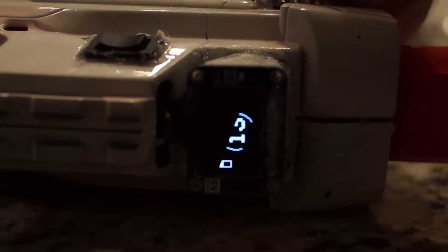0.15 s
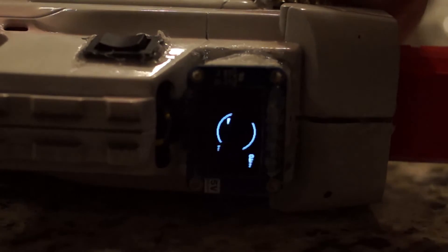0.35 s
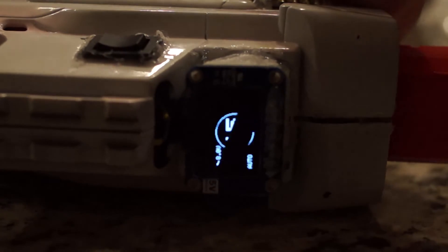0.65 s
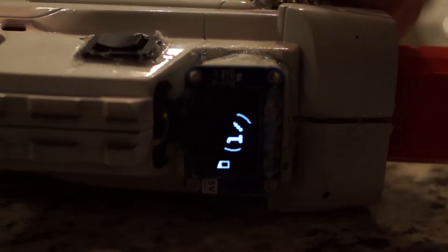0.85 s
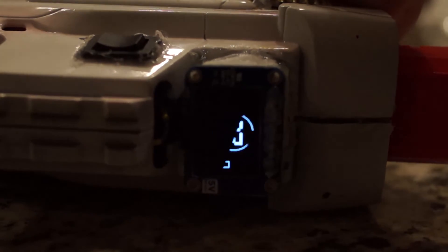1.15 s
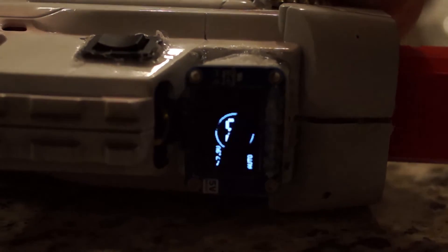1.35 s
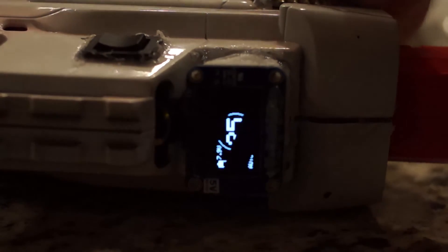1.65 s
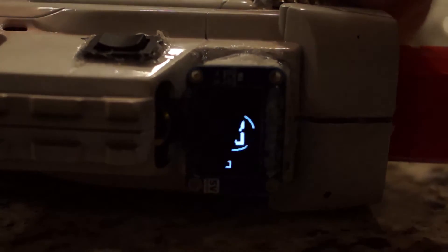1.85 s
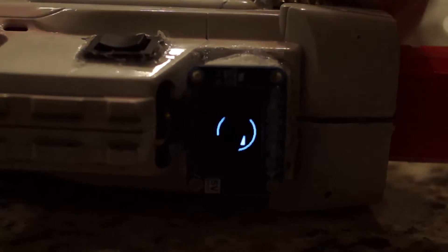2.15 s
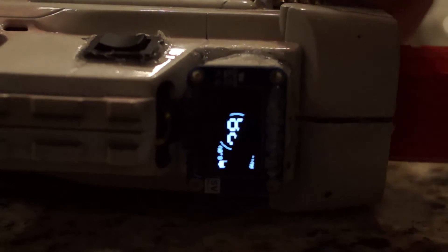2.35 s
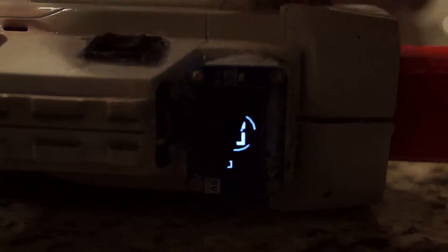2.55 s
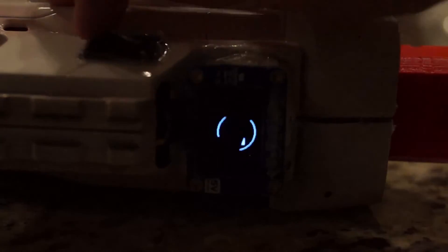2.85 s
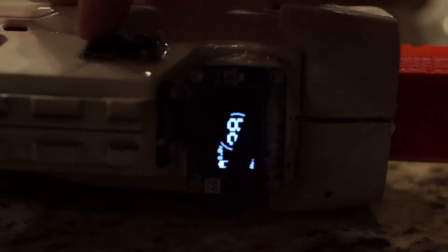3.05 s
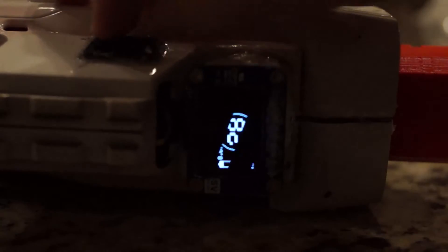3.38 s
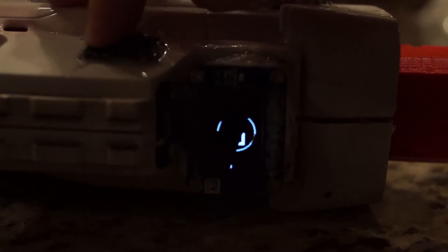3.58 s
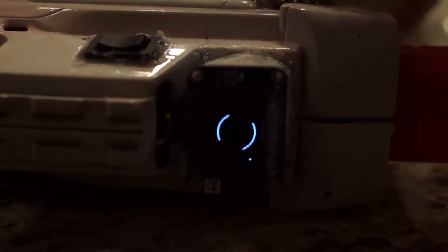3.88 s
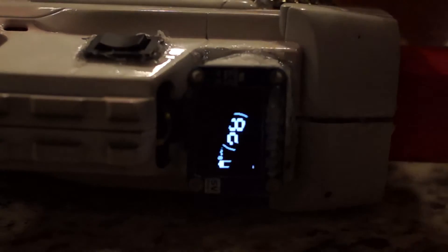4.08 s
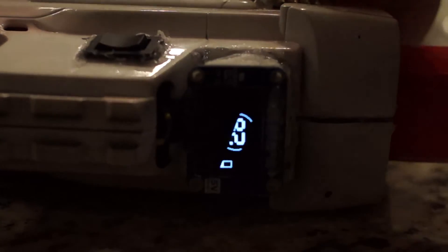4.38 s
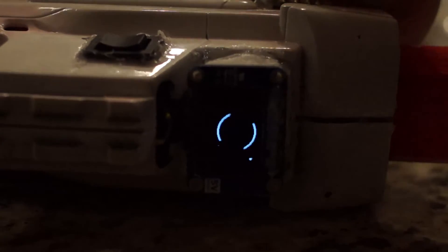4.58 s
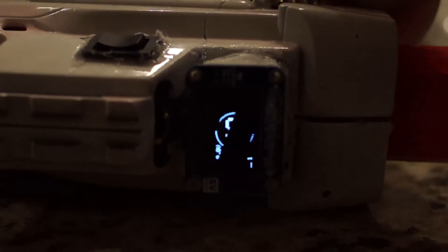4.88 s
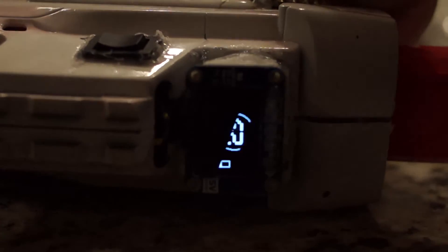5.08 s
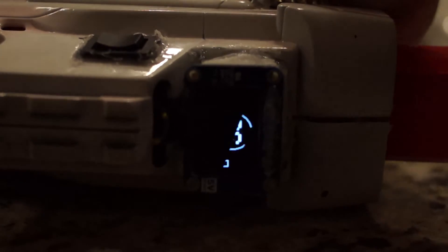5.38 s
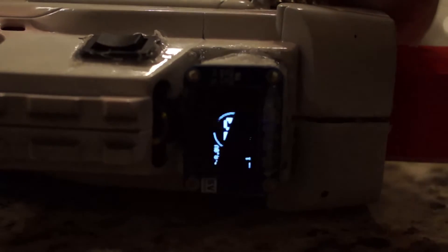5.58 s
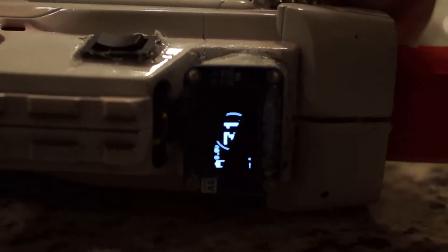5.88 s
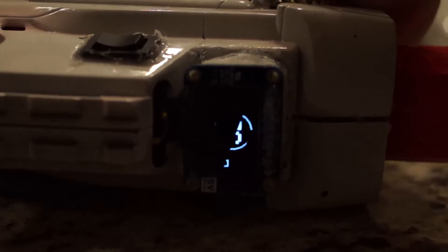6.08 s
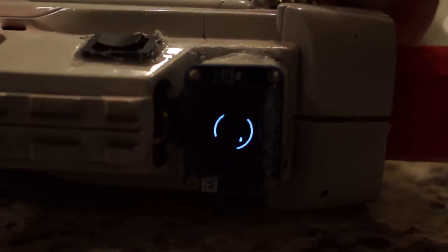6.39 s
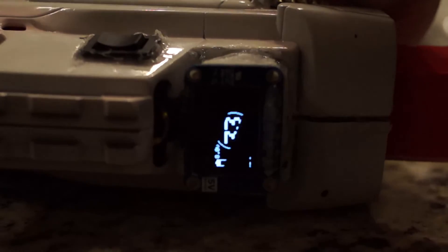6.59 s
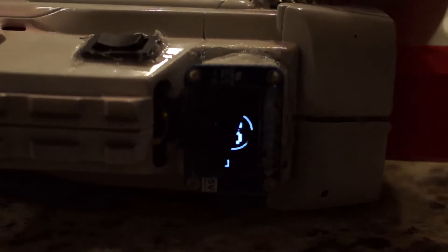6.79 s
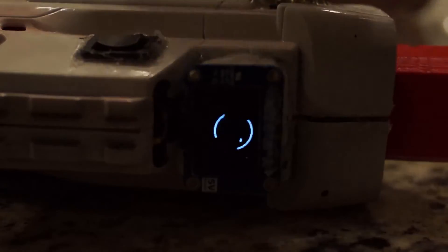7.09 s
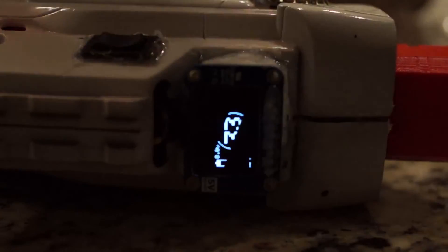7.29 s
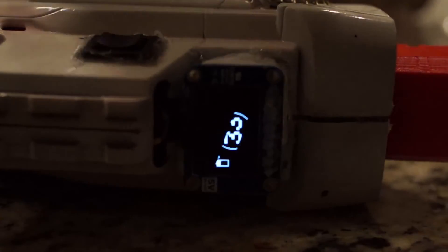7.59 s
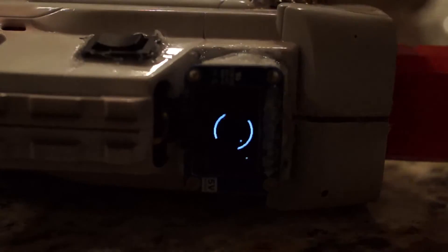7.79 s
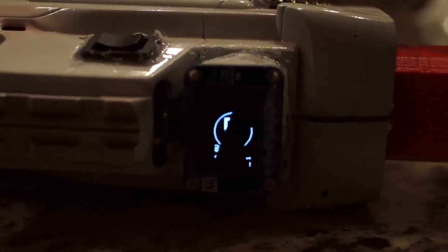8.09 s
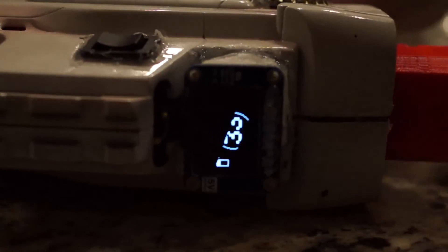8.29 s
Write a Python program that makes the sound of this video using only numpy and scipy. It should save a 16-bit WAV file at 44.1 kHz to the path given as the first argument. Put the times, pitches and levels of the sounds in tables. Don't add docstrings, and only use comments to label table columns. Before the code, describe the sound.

A close stereo pickup on a stone kitchen counter, with quiet air, hiss and low appliance hum; a faint echo of an earlier burst fades at the start. At 0.3 s a finger clicks a plastic trigger, and from 0.46 to 1.7 s a small geared motor spins up quickly to a steady nasal whine, with bright grinding hiss and rattling knocks about ten turns a second, then brakes with a falling pitch. More clicks near 2.0 s bring a short burst until 2.4 s. Light handling and crisp switch snaps follow at 3.2-3.7 s, with a stronger hollow clack at 4.2 s. From 4.7 to 6.4 s, five trigger pulls, roughly 0.4 s apart, each click and fire a tenth-of-a-second whirring clack with short room echoes. After a quiet second, plastic snaps and dull rocking thumps occur at 7.4-7.8 s, then sharper clicks from 8.1 to 8.4 s.

```python
import sys
import numpy as np
from scipy import signal
from scipy.fft import rfft, irfft, next_fast_len
from scipy.io import wavfile
from scipy.ndimage import uniform_filter1d, map_coordinates

SR = 44100
rng = np.random.default_rng(int(sys.argv[2]) if len(sys.argv) > 2 else 0)


def invert_db(x):
    u = np.asarray(x, float) / 20
    return 10 ** u


def unload_wav(signal):
    wavfile.write(
        sys.argv[1],
        SR,
        np.round(np.clip(np.atleast_2d(signal).T, -1, 1) * 32767).astype(np.int16),
    )


N = 372204
T = np.arange(N) / SR

# (power on [s], first knock [s], power off [s])
BURST_TIMES = [
    (.456, .4755, 1.676),
    (2.081, 2.1012, 2.388),
    (4.781, 4.8025, 4.888),
    (5.185, 5.2031, 5.289),
    (5.552, 5.5725, 5.658),
    (5.921, 5.941, 6.027),
    (6.294, 6.3165, 6.402),
]
BURST_DB = [-20, -20, -20, -19.5, -20, -19.5, -20]
BURSTS = [(*times, db) for times, db in zip(BURST_TIMES, BURST_DB)]
SHAFT_HZ = 590.8
TURN_S = .10163
# (shaft order, level [dB rms])
WHINE = [(1, -29.5), (2, -51.5), (3, -29.5), (4, -43), (6, -26), (7, -47), (14, -47)]
# (frequency [Hz], gain [dB])
RADIATION = [(300, -20), (540, -12.5), (585, 1.5), (1000, -2.5), (1250, 1), (1600, 6), (1770, 3),
             (2800, -4), (3400, 0.5), (3545, 2)]
# (time [s], thud [dB], tick [dB], decay t60 [s])
KNOCKS = [(0, 6, 2.5, 0.043), (.008, 3, 1, 0.057), (0.0293, 9, 6, 0.086), (.04, -4.5, -2, 0.028),
          (0.054, 5, 7, .07), (.068, 4, -10.5, 0.028), (0.073, -1, 8, 0.037)]
# (time [s], grind [dB], hiss [dB])
LOAD = [(0, -5, 4), (0.021, 0, 1), (.035, -6, -2.5), (.05, -1, -2.5), (.065, -4.5, 2), (.08, -2, -10.5),
        (.1, -7.5, 3)]
# (frequency [Hz], level [dB per Hz])
SHELL = [(200, -64.5), (330, -20), (430, -24), (520, -24.5), (630, -10), (690, -2.5), (850, -5),
         (1000, -2.5), (1350, -3), (1750, -2.5), (2070, -11), (3100, -15), (4400, -18.5), (7500, -107)]
# (frequency [Hz], width [Hz], lift [dB])
PANELS = [(482, 33, 10.5), (548, 24, 14.5), (670, 15, 1.5), (985, 50, 3), (1194, 55, 4), (1440, 31, -1),
          (1520, 18, 6), (2425, 120, 4.5), (2705, 100, 5)]
# (frequency [Hz], level [dB per Hz])
TEETH = [(1300, -26), (2200, -11.5), (2780, -4), (3160, -7.5), (4190, -6.5), (5700, -11), (7700, -14.5),
         (8300, -17), (9000, -19.5), (11500, -19)]
# (frequency [Hz], width [Hz], lift [dB])
CASING = [(3410, 210, 3.5), (4160, 150, 2.5), (6090, 220, 2), (8300, 250, 2.5)]

# (time [s], peak [dB])
LANDINGS = [(.312, -32.5), (.446, -34), (1.952, -33), (2.027, -40), (2.068, -35), (4.678, -35.5),
            (5.092, -36), (5.166, -30), (5.442, -27.5), (5.837, -29), (5.912, -30), (6.196, -23)]
# (snap [dB], tick [dB], left-right [dB])
LANDING_COLOUR = (-9, -18, 1)
# (spring ticks [s], latch drops [s], lever seats [s], strength [dB])
PULLS = [(.347, 0.367, .405, -38.5), (1.977, 1.99, 2.043, -33), (4.701, 4.713, 4.741, -30),
         (5.117, 5.126, 5.148, -30.5), (5.464, 5.475, 5.509, -31.5), (5.858, 5.867, 5.897, -31.5),
         (6.221, 6.236, 6.266, -31.5)]
CREAK_LEAD_S = .011
# (level over the strength [dB], snap [dB], tick [dB], left-right [dB])
STAGES = [
    (-5.5, -8, -16, -2),
    (-2.5, -2, -5, 2.5),
    (2, -13.5, -28, -.8),
    (-2, -9, -20, .6),
]
# (time [s], peak [dB], snap [dB], tick [dB], ring [Hz])
HANDLING = [(3.176, -56, 1, -16, 1560), (3.198, -48, -1, -19, 1850), (3.344, -47, -10, -21.5, 1770),
            (3.402, -42.5, -4, -24, 990), (4.076, -53, -11, -1.5, 1000), (4.144, -57, 1.5, 4, 1020),
            (4.202, -27.5, -5, -22, 1070), (4.211, -32, -22.5, -16, 830), (7.424, -32, 3, -28, 780),
            (7.598, -38, -2, -22.5, 1370), (7.635, -45, 10.5, -23, 2150), (7.656, -38, 5, -13, 2060),
            (7.795, -46.5, -0.5, -14.5, 1410), (8.101, -51.5, -1.5, -5, 1440),
            (8.128, -44, 10.5, -11, 1637), (8.362, -52, 7, -5, 1500), (8.396, -37, -4, -14, 1590)]
# (time [s], peak [dB], snap [dB], tick [dB], ring [Hz])
SNAPS = [(3.586, -36.5, 11.5, -1, 1820), (3.7161, -40, 9, 1.5, 1600), (4.175, -23, -11, -18.5, 1195),
         (7.57, -35, 5, -19, 2720), (8.212, -34.5, 7, -9, 1240), (8.3215, -34, 5, -9.5, 1060),
         (8.399, -27.5, 5, -17, 1850), (4.206, -27.5, -3, -10, 1010)]
# (pitch ratio, level [dB])
OVERTONES = [(1.55, -5), (2.7, -8)]
# (time [s], peak [dB], frequency [Hz])
THUMPS = [(4.204, -36.5, 802), (7.426, -35, 754), (7.449, -45, 555), (7.567, -40, 322), (7.598, -45, 520),
          (7.634, -44.5, 580), (7.655, -42, 555)]
HAND_PAN_DB, SWITCH_PAN_DB = 1, 3.5

# (frequency [Hz], decay t60 [s])
KITCHEN = [(300, 0.55), (800, 0.27), (2000, 0.35), (5500, 0.45), (11000, 0.33)]
# (frequency [Hz], level [dB per Hz])
FADING = [(300, -28), (900, -2), (1500, 2.5), (1900, 2), (2400, -12), (3800, -4.5), (6000, -17),
          (11000, -31)]
# (frequency [Hz], level [dB per Hz])
AIR = [(13, -52), (22, -27), (59, -5.5), (90, -12), (160, -3.5), (192, -9.5), (243, -3.5), (399, -8),
       (492, -8.5), (897, -16), (970, -15.5), (1440, -19), (1640, -22.5), (5580, -32), (11300, -40),
       (14700, -64), (22000, -120)]
# (frequency [Hz], width [Hz], lift [dB])
AIR_BANDS = [(1740, 300, 4), (5400, 390, 4)]
# (frequency [Hz], likeness)
ALIKE = [(30, 1), (150, 1), (400, 0.95), (1000, 0.725), (3000, 0.41), (10000, 0.86)]
# (frequency [Hz], level [dB rms])
HUM = [(120, -62.5), (151, -70), (170, -60.5)]
AIR_DB = -50.5
# (frequency [Hz], gain [dB])
EDGE = [(24, -15.5), (40, -1), (10980, -0.5), (11120, -36), (12100, -79), (12300, -110)]


def unit(x):
    return x / np.sqrt(np.mean(x ** 2) + 1e-20)


def along(points, hz):
    f, v = np.transpose(points)
    return np.interp(np.log(hz + 1), np.log(f + 1), v)


def lifts(peaks, hz):
    return sum(db / (1 + (2 * (hz - peak_hz) / width) ** 2) for peak_hz, width, db in peaks)


def coloured(x, db_at):
    m = 2 * next_fast_len(N // 2 + 8192)
    gain = invert_db(np.maximum(db_at(np.fft.rfftfreq(m, 1 / SR)), -100))
    cepstrum = irfft(np.log(unit(gain)), m)
    cepstrum[1:m // 2] *= 2
    cepstrum[m // 2 + 1:] = 0
    return irfft(rfft(x, m) * np.exp(rfft(cepstrum)), m)[..., :N]


def band(x, low_hz, high_hz):
    return signal.sosfilt(signal.butter(2, [low_hz, high_hz], "band", fs=SR, output="sos"), x)


def wobble(rate):
    return map_coordinates(rng.standard_normal(int(N * rate / SR) + 4), [T * rate])


def dying(times, gains, t60):
    jumps = np.bincount(np.round(np.asarray(times) * SR).astype(int), gains, N)[:N]
    return signal.lfilter([1], [1, -invert_db(-60 / (t60 * SR))], jumps)


def rings(rows, t60):
    out = np.zeros(N + SR)
    t = np.arange(SR // 5) / SR
    for s, db, hz in rows:
        out[round(s * SR):][:len(t)] += invert_db(db - 60 * t / t60) * np.sin(2 * np.pi * hz * t)
    return out[:N]


def motor_motion():
    speed, force, crank, power = np.zeros((4, N))
    for on, first, off, db in BURSTS:
        powered = np.minimum(T, off)
        since_off = np.clip(T - off, 0, None)
        spin_up = 1 - np.exp(-np.clip(powered - on, 0, None) / .024)
        burst_speed = spin_up * np.exp(-since_off / .035)
        now = burst_speed > speed
        speed[now] = burst_speed[now]
        force[now] = invert_db(db)
        crank[now] = ((powered - first) % TURN_S)[now]
        power[now] = np.exp(-since_off / 0.16)[now]
    return speed, force, crank, power


def motor_whine(speed, force, power):
    unsteady = 1 + 0.00073 * wobble(20) + 0.051 * (1 - speed) * wobble(120)
    angle = 2 * np.pi * np.cumsum(SHAFT_HZ * speed * unsteady) / SR
    strain = 1 + 9 * (1 - speed) * speed * power ** 0.51 * invert_db(2.6 * wobble(70))
    whine = np.zeros(N)
    for order, db in WHINE:
        radiated_db = db + along(RADIATION, order * SHAFT_HZ * speed)
        level = invert_db(radiated_db + .6 * wobble(30)) * np.sqrt(2)
        drive = strain if order < 5 else speed ** 3
        whine += level * drive * np.sin(order * angle)
    return whine * speed * power * force / invert_db(-16.5)


def gear_noise(speed, force, crank):
    at, grind_db, hiss_db = np.transpose(LOAD)
    teeth = invert_db(2.4 * wobble(260))
    grind = invert_db(np.interp(crank, at, grind_db) + 1.6 * wobble(30)) * teeth * force * speed ** 0.59
    hiss = invert_db(np.interp(crank, at, hiss_db) + 1.4 * wobble(30)) * teeth * force * speed ** 1.4
    starts, levels = np.transpose(BURSTS)[[0, 3]]
    grind += uniform_filter1d(dying(starts + 0.0051, invert_db(levels - 1.5), 0.23), size=420)
    hiss += uniform_filter1d(dying(starts + .002, invert_db(levels - 15), .06), size=120)
    scatter_db = 1.5
    for offset, thud_db, tick_db, t60 in KNOCKS:
        hits = np.array([(s, db) for on, first, off, db in BURSTS
                         for s in np.arange(first, off - .06, TURN_S) + offset])
        luck = rng.standard_normal((len(hits), 3))
        times = hits[:, 0] + .0008 * luck[:, 0]
        pace = np.interp(times, T, speed) ** 0.55
        thud = pace * invert_db(hits[:, 1] + thud_db + scatter_db * luck[:, 1])
        tick = pace * invert_db(hits[:, 1] + tick_db + scatter_db * luck[:, 2])
        grind += uniform_filter1d(dying(times + 0.00073, thud, t60), size=90)
        hiss += dying(times, tick, 0.6 * t60)
    worn = 0.6 * rng.standard_normal(SR)[(crank * SR).astype(int)]
    rough = grind * (worn + 0.87 * rng.standard_normal(N))
    shell = coloured(rough, lambda hz: along(SHELL, hz) + lifts(PANELS, hz))
    mid, side = coloured(hiss * rng.standard_normal((2, N)), lambda hz: along(TEETH, hz) + lifts(CASING, hz))
    bright = np.array([mid + 0.23 * side, mid - 0.4 * side])
    return invert_db(-3.5) * shell * invert_db([[.4], [-.4]]) + invert_db(-6) * bright * invert_db([[-.5], [.5]])


def motor():
    speed, force, crank, power = motor_motion()
    whine = motor_whine(speed, force, power)
    return whine * invert_db([[.6], [-.6]]), gear_noise(speed, force, crank)


def clicks(rows, knock_t60, snap_t60, tick_t60, size, strike):
    s, db, snap_db, tick_db, pan_db = np.transpose(rows)[:5]
    parts = [(db + 10.5, knock_t60, 650, 1500),
             (db + snap_db + 4.5, snap_t60, 1600, 3900),
             (db + tick_db + 3.5, tick_t60, 4500, 10500)]
    out = np.zeros((2, N))
    for level, t60, low_hz, high_hz in parts:
        noise = rng.standard_normal(N)
        noise[np.round(s * SR).astype(int)] = strike
        sides = [noise * uniform_filter1d(dying(s, invert_db(level + side * pan_db / 2), t60), size)
                 for side in (1, -1)]
        out += band(sides, low_hz, high_hz)
    return out


def trigger():
    rows = [(s, db, *LANDING_COLOUR) for s, db in LANDINGS]
    for tick, latch, seat, db in PULLS:
        times = (tick - CREAK_LEAD_S, tick, latch, seat)
        rows += [(s, db + lift_db, *colour) for s, (lift_db, *colour) in zip(times, STAGES)]
    return clicks(rows, 0.043, 0.049, 0.026, size=60, strike=0.92)


def handling():
    grip = [(*row[:4], HAND_PAN_DB) for row in HANDLING]
    switch = [(*row[:4], SWITCH_PAN_DB) for row in SNAPS]
    return (clicks(grip, 0.041, 0.039, 0.028, size=10, strike=1.6)
            + clicks(switch, 0.015, 0.014, 0.016, size=1, strike=1.5))


def levers():
    tones = [(s, db + max(snap_db, 0) - 4, hz) for s, db, snap_db, tick_db, hz in HANDLING + SNAPS]
    overtones = [(s, db + max(snap_db, 0) - 6 + less_db, hz * ratio)
                 for s, db, snap_db, tick_db, hz in SNAPS for ratio, less_db in OVERTONES]
    return rings(tones, .014) + rings(overtones, 0.011)


def rocking():
    s, db, hz = np.transpose(THUMPS)
    thump = dying(s, invert_db(db + 13.5), 0.13) * rng.standard_normal(N)
    return rings(THUMPS, 0.19) + band(thump, 180, 777)


def counter(x, t60):
    t = np.arange(SR // 8) / SR
    shared, own = rng.standard_normal((2, len(t))) * invert_db(-60 * t / t60) * (t > .0015)
    tails = np.array([shared + 0.86 * own, shared - 0.8 * own]) / np.linalg.norm(shared)
    return signal.fftconvolve(x, tails, axes=1)[:, :N]


def kitchen(x, spread_db):
    delayed = np.pad(x.mean(0), (220, 0))[:N]
    hz, t, z = signal.stft(delayed, SR, nperseg=512)
    keep = invert_db(-120 * t[1] / along(KITCHEN, hz))
    power = [signal.lfilter([0, 1 - k], [1, -k], np.abs(row) ** 2) for k, row in zip(keep, z)]
    noise = signal.stft(rng.standard_normal((2, N)), nperseg=512)[2]
    mid, side = signal.istft(noise / np.std(noise) * np.sqrt(power), nperseg=512)[1][:, :N]
    return np.array([mid + invert_db(spread_db) * side, mid - invert_db(spread_db) * side])


def earlier_burst():
    fading = dying([0], [invert_db(-44.5)], 0.46) * rng.standard_normal((2, N))
    echo = coloured(fading, lambda hz: along(FADING, hz))
    return echo.mean(0) + 0.43 * echo


def background():
    hz = np.fft.rfftfreq(N, 1 / SR)
    turn = np.arccos(np.clip(along(ALIKE, hz), -1, 1)) / 2
    z = rfft(rng.standard_normal((2, N))) * invert_db(along(AIR, hz) + lifts(AIR_BANDS, hz))
    mid, side = irfft(z * [np.cos(turn), np.sin(turn)], N)
    air = invert_db(AIR_DB + 0.69 * wobble(1.78)) * unit(np.array([mid + side, mid - side]))
    hum = np.zeros((2, N))
    for hum_hz, db in HUM:
        level = invert_db(db + 0.83 * wobble(4.9)) * np.sqrt(2)
        phase = 2 * np.pi * hum_hz * T + 0.13 * wobble(4.1) + np.array([[.2], [-.2]])
        hum += level * np.sin(phase)
    return air + hum


def scene():
    whine, gears = motor()
    near = gears + trigger() + handling() + levers() + rocking()
    near = near + invert_db(-12) * counter(near, t60=.12)
    room = kitchen(invert_db(-8.5) * (near + whine / 2), spread_db=-7)
    return near + whine + room + earlier_burst() + background()


def top_cut(x):
    return signal.sosfilt(signal.butter(12, 12110, fs=SR, output="sos"), x)


def record(dry):
    loud = np.sqrt(np.abs(dying(T, dry.mean(0) ** 2, 1.74) / SR))
    eased = dry / (1 + loud / invert_db(-23)) ** 0.32
    rounded = eased / (1 + np.abs(eased / .65) ** 4) ** (1 / 4)
    edge = invert_db(along(EDGE, np.fft.rfftfreq(N, 1 / SR)))
    limited = irfft(rfft(rounded) * edge, N)
    return top_cut(limited)


dry = scene()
out = record(dry)
unload_wav(out)
```